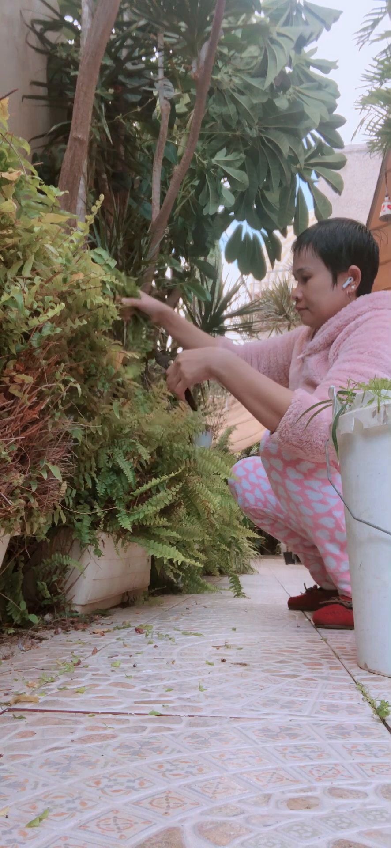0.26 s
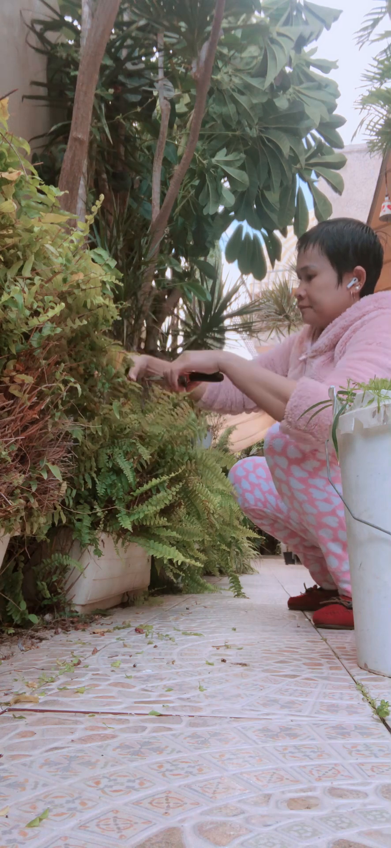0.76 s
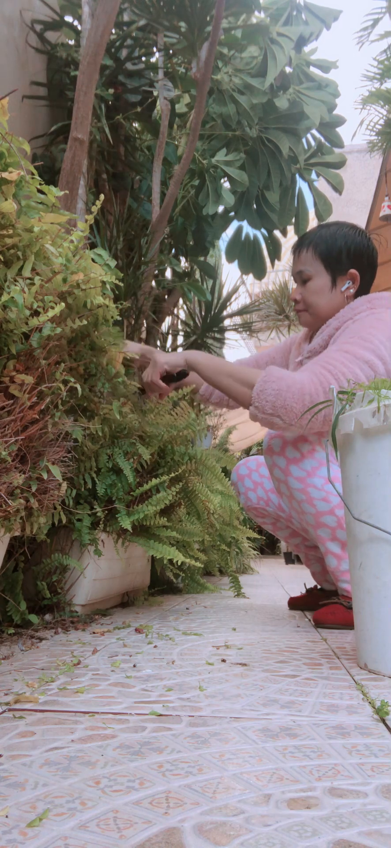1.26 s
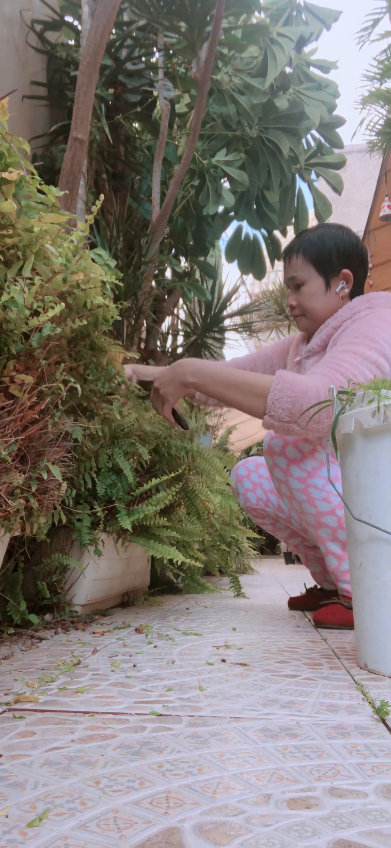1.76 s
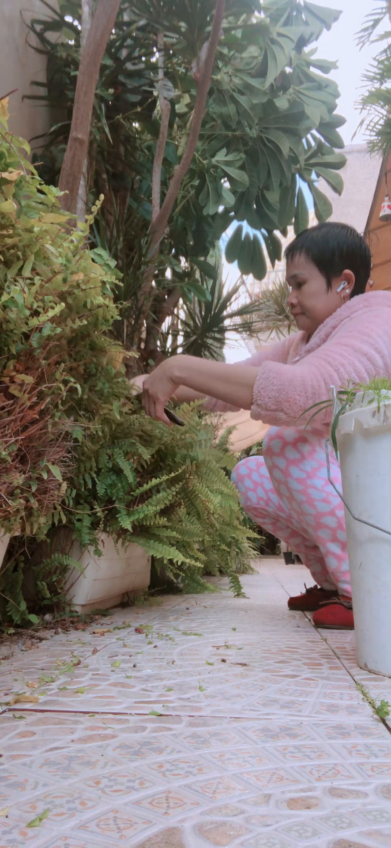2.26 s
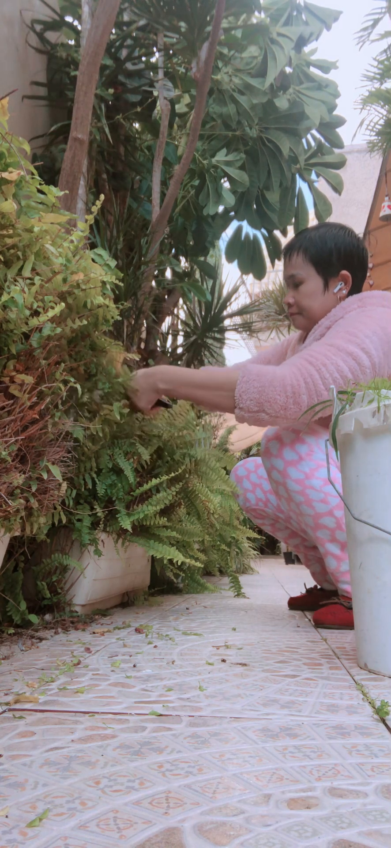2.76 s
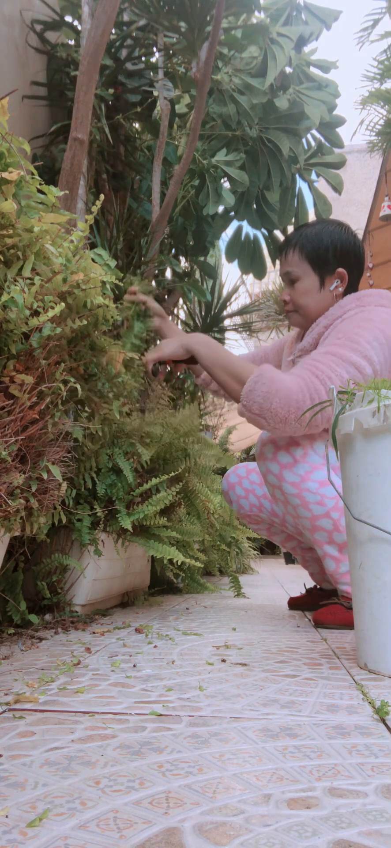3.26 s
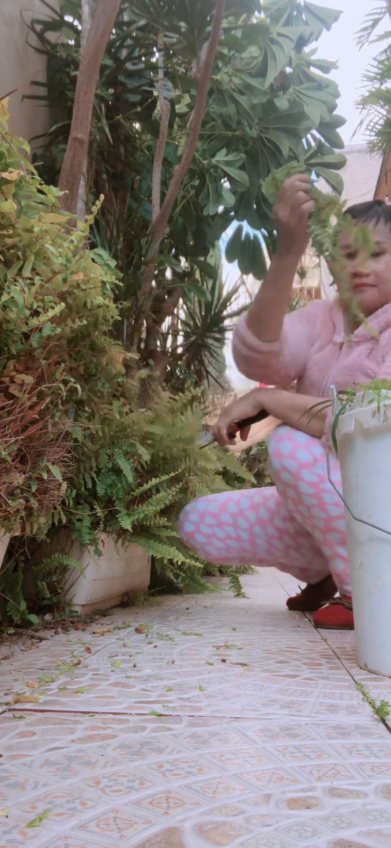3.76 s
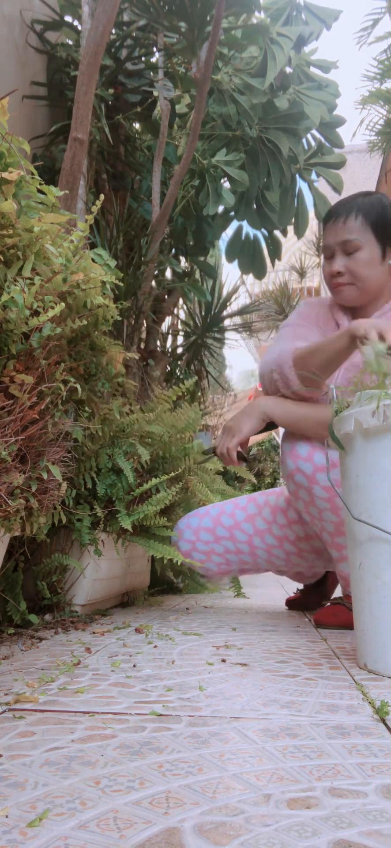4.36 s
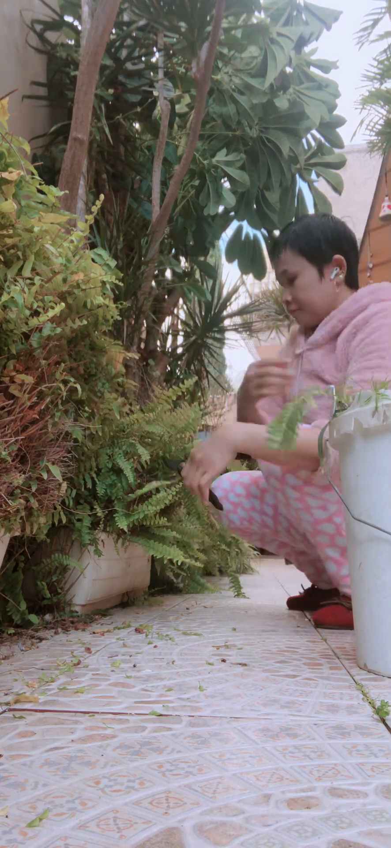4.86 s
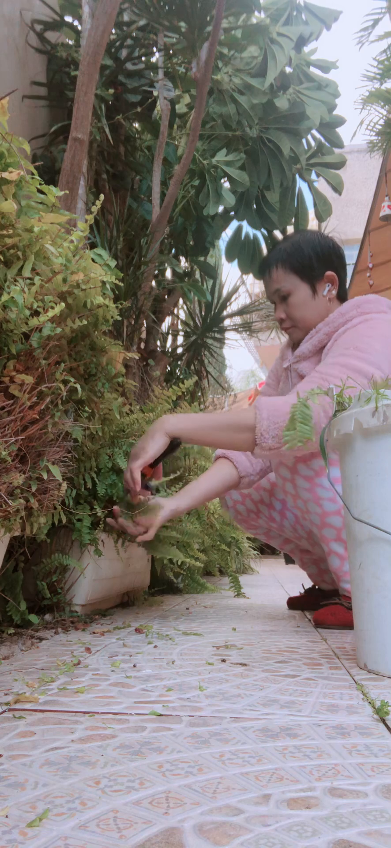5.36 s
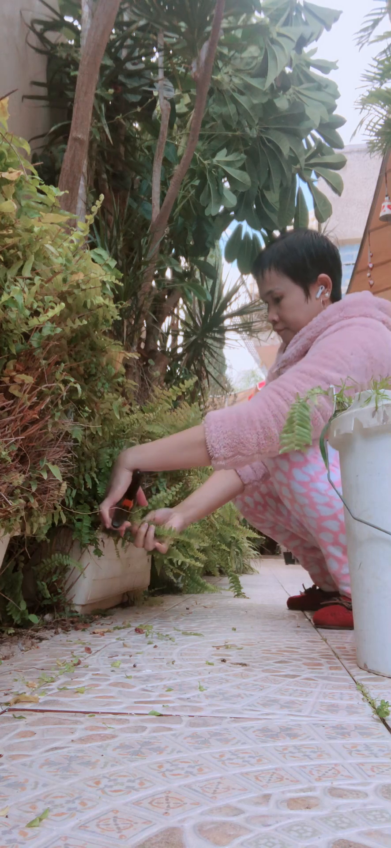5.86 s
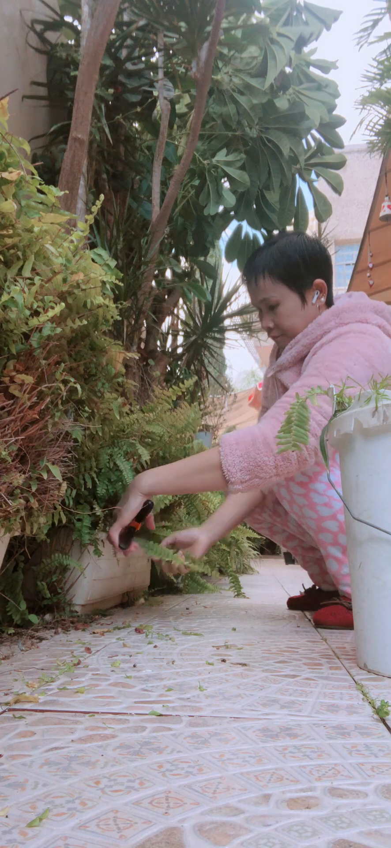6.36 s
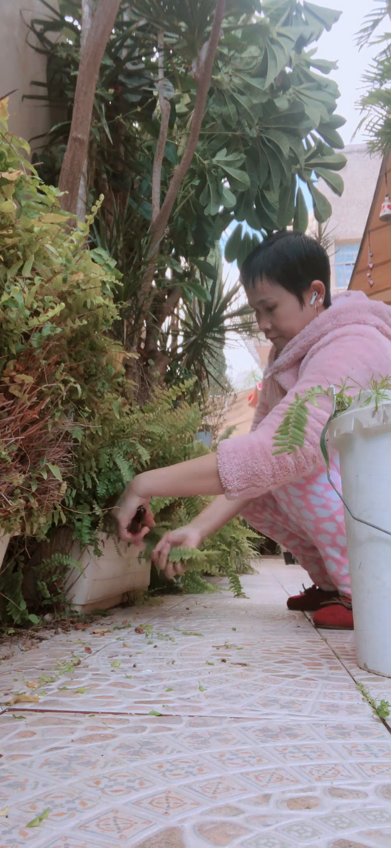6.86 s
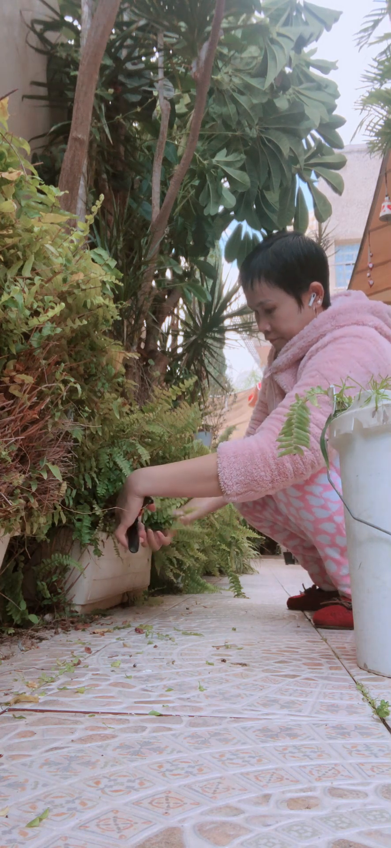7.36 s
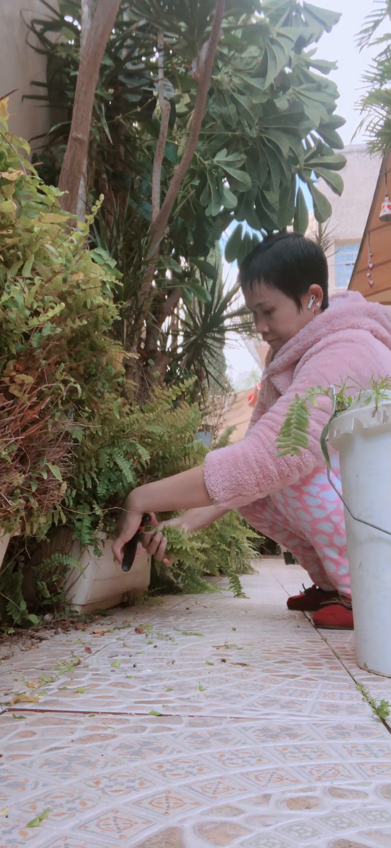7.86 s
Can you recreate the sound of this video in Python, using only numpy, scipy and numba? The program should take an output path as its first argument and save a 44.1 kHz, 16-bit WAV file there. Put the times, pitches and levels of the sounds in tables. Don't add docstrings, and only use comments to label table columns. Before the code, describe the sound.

Someone prunes plants close to the microphone in a small hard-walled yard. First come soft contacts, dry leaf rustle and distant chattering birds; then a snap and a hollow bucket thud with a short rattle. The flock thins, a shoe squeaks faintly, and bright shear crunches follow in a cluster, singly, then as light clicks. A low machine hum and town rumble persist throughout.

```python
import sys
import numpy as np
from scipy import signal
from scipy.fft import rfft, irfft
from scipy.io import wavfile
from numba import njit

SR = 44100
rng = np.random.default_rng(int(sys.argv[2]) if len(sys.argv) > 2 else 0)


def unload_audio(sound):
    columns = np.transpose(np.atleast_2d(sound))
    steps = np.round(np.clip(columns, -1, 1) * 32767)
    wavfile.write(sys.argv[1], SR, steps.astype(np.int16))


def decibels_to_gain(level_db):
    exponent = np.asarray(level_db, float) / 20
    return 10 ** exponent


N = 357200


def rms_one(x):
    return x / np.sqrt(np.mean(x ** 2) + 1e-20)


def in_time(rows):
    seconds, *columns = np.transpose(rows)
    return [np.interp(np.arange(N) / SR, seconds, column) for column in columns]


def drift(rate_hz):
    r = np.exp(-80 * np.pi * rate_hz / SR)
    slow = signal.lfilter([1], [1, -2 * r, r * r], rng.standard_normal(N // 40 + 2002))
    slow = slow[2000:]
    return np.interp(np.arange(N) / 40, np.arange(len(slow)), rms_one(slow))


def resonate(x, hz, width_hz):
    r = np.exp(-np.pi * width_hz / SR)
    top = np.array([1, 0, -1]) * (1 - r * r) / 2
    return signal.lfilter(top, [1, -2 * r * np.cos(2 * np.pi * hz / SR), r * r], x)


def twice(x, hz, width_hz):
    return resonate(resonate(x, hz, width_hz), hz, width_hz)


@njit
def glide(x, hz, width_hz, rate):
    r, y = np.exp(-np.pi * width_hz / rate), np.zeros(len(x))
    for i in range(2, len(x)):
        push = (1 - r * r) / 2 * (x[i] - x[i - 2])
        y[i] = push + 2 * r * np.cos(2 * np.pi * hz[i] / rate) * y[i - 1] - r * r * y[i - 2]
    return y


def coloured(x, spectrum):
    hz, db = np.transpose(spectrum)
    f = np.fft.rfftfreq(N, 1 / SR) + 1
    gain = decibels_to_gain(np.interp(np.log(f), np.log(hz), db))
    gain = gain * np.minimum(f / hz[0], 1) ** 4 * np.minimum(hz[-1] / f, 1) ** 8
    return rms_one(irfft(rfft(x) * gain, N))


def grains(per_s, spread_db):
    size = decibels_to_gain(spread_db * np.minimum(rng.exponential(1, N), 5))
    return (rng.random(N) < per_s / SR) * size * rng.choice([-1, 1], N)


def swells(rows, rise, fall, rest_db):
    t = np.arange(0, N + 200, 100) / SR
    power = decibels_to_gain(rest_db) ** 2
    for s, hold, db in rows:
        below_db = rise * np.maximum(s - t, 0) + fall * np.maximum(t - s - hold, 0)
        power = power + decibels_to_gain(db - below_db) ** 2
    return np.interp(np.arange(N) / SR, t, np.sqrt(power))


def town():
    # pitch in Hz, strength in dB per Hz.
    town_tone = [(16, -53), (28, -2.5), (106, -13.5), (124, -10), (153, -8), (216, -10), (399, -17),
                 (775, -20.5), (1280, -26), (2430, -31), (5830, -50), (7810, -69), (11300, -48),
                 (16000, -65)]
    # pitch in Hz, width in Hz, level in dB.
    hum_lines = [(50.5, 28, 3), (222.9, 10.6, -55), (772, 23, -68), (958, 360, -64)]
    # time in seconds, hum level in dB, rumble level in dB.
    hum_level = [(0.0, -36.5, -47.5), (0.79, -41, -45), (1.33, -39.5, -51), (1.74, -37, -42.5),
                 (2.64, -42, -50.5), (3.2, -37, -43.5), (3.88, -38.5, -48), (4.17, -39, -38),
                 (4.44, -41, -47), (5.21, -36.5, -46.5), (6.7, -40.5, -51.5), (8.1, -36.5, -44.5)]
    town_db, hum_hz = -46, 99.05
    hum_db, rumble_db = in_time(hum_level)
    out = decibels_to_gain(town_db + drift(1.2) / 2) * coloured(rng.standard_normal(N), town_tone)
    hum_phase = 2 * np.pi * hum_hz * np.arange(N) / SR + 0.5 * drift(2.5)
    out += np.sqrt(2) * decibels_to_gain(hum_db) * np.sin(hum_phase)
    for k, (hz, width_hz, db) in enumerate(hum_lines):
        line = decibels_to_gain(db) * rms_one(twice(rng.standard_normal(N), hz, width_hz))
        if k == 0:
            line = line * decibels_to_gain(rumble_db - 1.0)
        out += line
    return out


def leaves():
    # pitch in Hz, strength in dB per Hz.
    leaf_tone = [(2940, 11.5), (5000, -14), (6160, 13), (7670, -2), (8880, 10), (11700, 9.5), (15200, -4),
                 (16600, -23)]
    # full strength at in seconds, hold in seconds, level in dB.
    stirs = [(0, 0.042, -70), (.42, 0.039, -67), (1.42, 0.19, -63), (1.85, 0.093, -69), (2.02, 0.2, -64.5),
             (2.3, 0.14, -65), (2.6, 0.012, -59.5), (2.83, 0.22, -59), (3.52, 0.0093, -62),
             (3.9, 0.088, -55), (4.2, 0.05, -60), (4.57, .01, -73), (4.81, 0.0083, -73), (4.98, 0.039, -88),
             (5.26, .02, -76), (5.4, 0.082, -63.5), (5.77, 0.098, -65), (6.1, 0.018, -67), (6.44, .01, -71),
             (6.6, 0.14, -69), (6.9, 0.049, -66.5), (7.02, .01, -71), (7.24, 0.097, -59.5),
             (7.53, 0.12, -64.5), (7.75, 0.26, -64), (7.95, .045, -64), (8.03, .07, -65)]
    stir = swells(stirs, rise=107, fall=109, rest_db=-75)
    dry_grains = rms_one(grains(1200, spread_db=4.5))
    rustle = coloured(rng.standard_normal(N) + 0.58 * dry_grains, leaf_tone)
    return stir * decibels_to_gain(5.5 + 1.8 * drift(67) + 1.3 * drift(8.7)) * rustle


def twigs():
    # start in seconds, peak level in dB.
    ticks = [(0.4589, -51), (1.5249, -42), (2.0656, -34), (2.3431, -43), (3.6277, -50), (3.8631, -48),
             (4.568, -38), (4.8035, -44), (6.3001, -53), (6.4418, -38), (6.4455, -42), (6.186, -50),
             (6.321, -57), (6.3674, -55), (6.4114, -51), (7.0135, -40), (7.2394, -37), (7.3916, -42),
             (7.5737, -45), (8.0242, -44)]
    tick_s = 0.0015
    out, t = np.zeros(N + SR), np.arange(SR // 50) / SR
    for s, db in ticks:
        snap = resonate(rng.standard_normal(len(t)) * np.exp(-t / tick_s), 10500, 7000.0)
        out[int(s * SR):][:len(t)] += decibels_to_gain(db - 1.5) * snap / np.abs(snap).max()
    return out[:N]


def flock():
    # pitch in Hz, strength in dB per Hz.
    flock_tone = [(760, 33), (1300, -61), (1420, 0.5), (2380, 6.5), (3060, 2), (3530, 1.5), (6160, -6),
                  (7440, -19), (8500, -5.5), (11000, 18), (18700, -120)]
    # full voice at in seconds, hold in seconds,
    # level in dB, brightness in dB, throat pitch in Hz.
    flock_calls = [(0, 0.011, -56.5, -14, 2400), (.15, 0.048, -46.5, -6, 2230),
                   (.36, 0.056, -47, -5.5, 2730), (.47, 0.1, -48.5, -8, 2770), (.84, 0.052, -46, -8, 2200),
                   (1.08, 0.1, -49.5, -5, 2220), (1.22, 0.041, -49, -15, 1850),
                   (1.49, 0.067, -51.5, -5, 2280), (1.58, 0.056, -48, -12.5, 2070),
                   (1.81, 0.051, -49, -5.5, 1890), (1.94, 0.077, -52.5, -2, 2060),
                   (2.07, 0.091, -48.5, -10.5, 2340), (2.25, 0.089, -52, -9, 1840),
                   (2.41, 0.033, -48.5, -5.5, 2500), (2.53, 0.074, -48.5, -8, 2400),
                   (2.72, 0.1, -50.5, -8.5, 1750), (2.9, 0.069, -50.5, -9, 2120),
                   (3.06, 0.028, -49, -4, 2290), (3.2, 0.037, -47.5, -4.5, 1860),
                   (3.48, 0.027, -45, -7.5, 2440), (3.78, 0.076, -43.5, -7.5, 2550),
                   (3.97, 0.041, -46.5, -8, 2180),
                   (4.1, .04, -49.5, -17, 2400), (4.22, 0.2, -53, -9, 2030),
                    (4.5, 0.088, -57.5, -13, 2250), (4.67, 0.16, -48.5, -10.5, 2340),
                    (4.95, 0.028, -49, -7.5, 2420), (5.248, 0.066, -49, -12, 2450),
                    (5.41, 0.041, -50.5, -10.5, 2400), (5.55, 0.064, -49, -11, 2270),
                    (5.72, .06, -55, -19, 2300), (5.94, 0.064, -52.5, -9, 2320),
                    (6.11, 0.037, -50, -11, 2350), (6.43, 0.015, -55, -20, 2280),
                    (6.579, 0.1, -48.5, -4, 2550), (6.89, 0.074, -48, -11.5, 2510),
                    (7.18, 0.1, -45, -7.5, 2430), (7.52, 0.048, -54.5, -11, 2470),
                    (7.62, 0.07, -49, -7.5, 2490), (8.02, 0.073, -48, -8, 2470)]
    rise, lead_s, tail_s = 296, 0.04, 0.046
    throat_ratios, throat_scatter, throat_db = np.array((0.97, 1.523, 2.36)), 0.096, -7
    calls = flock_calls
    rasp = swells([call[:3] for call in calls], rise, fall=82, rest_db=-67.5)
    bright_rows = [(s, hold, db + bright_db) for s, hold, db, bright_db, _ in calls]
    bright = swells(bright_rows, rise, fall=147, rest_db=-70.5)

    pulses = np.diff(np.floor(np.cumsum(1150 * (1 + 0.091 * drift(40)) / SR)), prepend=0)
    source = coloured(0.66 * rms_one(pulses) + rng.standard_normal(N), flock_tone)

    low, top, edges = 0, 0, np.geomspace(1300, 8000, num=15)
    for k, band in enumerate(zip(edges, edges[1:])):
        band_filter = signal.butter(2, band, "band", fs=SR, output="sos")
        part = (-1) ** k * decibels_to_gain(3.0 * drift(10)) * signal.sosfilt(band_filter, source)
        if band[0] < 4500:
            low = low + part
        else:
            top = top + part
    out = decibels_to_gain(-1.0) * (rasp * rms_one(low) + bright * decibels_to_gain(2.5) * rms_one(top))

    for s, hold, db, _, hz in calls:
        air, scatter = rng.standard_normal(SR // 2), rng.standard_normal(3)
        at, length = int(max(s - lead_s, 0) * SR), lead_s + hold + tail_s
        t = np.arange(min(int(length * SR), N - at)) / SR
        throat_hz = hz * throat_ratios * (1 + throat_scatter * scatter * [0, 1, 1])
        voice = 0
        for k, f in enumerate(throat_hz):
            ring = twice(air, f, 170 + (60 + 0.057 * f) * k)[-len(t):]
            voice = voice + decibels_to_gain(-4.5 * k) * rms_one(ring)
        swell = np.sqrt(np.abs(np.sin(np.pi * t / length)))
        out[at:][:len(t)] += decibels_to_gain(db + throat_db) * swell * voice
    return out


def whistles():
    # start in seconds, length in seconds, from pitch in Hz, to pitch in Hz, level in dB.
    clear_notes = [(0.368, 0.085, 2740, 2750, -50), (.43, .15, 6320, 6380, -49),
                   (.54, .098, 3251, 3275, -46), (.54, 0.055, 4820, 4830, -49), (.8, .14, 2240, 2060, -54),
                   (0.844, 0.076, 3650, 3600, -50), (1.201, 0.22, 1860, 1824, -48),
                   (1.707, 0.12, 1840, 1860, -44), (1.82, 0.057, 2950, 2920, -49),
                   (1.909, .11, 2100, 2060, -53.5), (2.05, .09, 2350, 2400, -57),
                   (2.179, 0.13, 1790, 1800, -48), (2.37, .11, 2540, 2470, -51),
                   (2.5, .06, 2280, 2300, -51), (2.543, 0.075, 2410, 2426, -52),
                   (2.582, 0.11, 2100, 2080, -53.5), (2.68, .15, 1720, 1696, -54),
                   (2.89, .1, 2200, 2100, -50), (3.18, 0.19, 1890, 1820, -54),
                   (3.72, 0.067, 2550, 2850, -49), (3.962, 0.0334, 1510, 1780, -48),
                   (4.25, 0.065, 3110, 3170, -54), (7.27, .07, 2990, 2880, -52)]
    width_hz, clear_share = 55, 0.45
    out = np.zeros(N)
    for s, length, from_hz, to_hz, db in clear_notes:
        air = rng.standard_normal(SR // 3)
        t = np.arange(int(length * SR)) / SR
        hz = np.interp(np.arange(len(air)), [len(air) - len(t), len(air)], [from_hz, to_hz])
        breath = glide(glide(air, hz, width_hz, SR), hz, width_hz, SR)[-len(t):]
        tone = np.sqrt(2) * np.sin(2 * np.pi * np.cumsum(hz[-len(t):]) / SR)
        note = clear_share * tone + (1 - clear_share) * rms_one(breath)
        out[int(s * SR):][:len(t)] += decibels_to_gain(db) * np.sin(np.pi * t / length) * note
    return out


def cries():
    # start in seconds, length in seconds, pitch in Hz, level in dB.
    cry_rows = [(0.133, 0.099, 5130, -50.5), (.46, 0.12, 3840, -51), (0.527, .13, 4890, -65),
                (0.862, 0.078, 3700, -59), (1.14, 0.13, 2300, -51), (1.801, .09, 2930, -53),
                (1.81, 0.075, 3900, -50.5), (1.915, 0.094, 3590, -49.5), (1.925, 0.066, 4120, -49.5),
                (2.067, 0.068, 3760, -49), (2.295, 0.064, 3440, -51.5), (2.535, 0.045, 3580, -45),
                (2.574, 0.067, 4100, -48), (2.75, 0.11, 2500, -53), (2.891, .11, 4130, -51),
                (2.89, 0.055, 3670, -51), (3.047, .11, 3310, -50), (3.176, 0.11, 3670, -53),
                (3.49, 0.063, 4000, -49), (3.518, 0.076, 3400, -50), (3.776, 0.056, 4200, -48),
                (4.66, 0.067, 5700, -53), (4.79, .05, 5400, -56), (5.161, 0.056, 2500, -50.5),
                (5.963, 0.045, 3660, -52), (6.6, 0.095, 5140, -53), (6.902, 0.095, 4900, -55),
                (7.162, 0.036, 4200, -44), (7.26, .07, 4900, -55), (7.592, 0.053, 5500, -57)]
    width_hz = 240
    out = np.zeros(N + SR)
    for s, length, hz, db in cry_rows:
        t = np.arange(int(length * SR)) / SR
        voice = rms_one(twice(rng.standard_normal(SR // 4), hz, width_hz)[-len(t):])
        out[int(s * SR):][:len(t)] += decibels_to_gain(db) * np.sin(np.pi * t / length) * voice
    return out[:N]


def near_bird():
    # time in seconds, pitch in Hz, level in dB.
    chirps = [
        [(1.161, 8600, -70), (1.166, 8500, -27), (1.174, 8320, -30.5), (1.182, 8130, -39), (1.205, 7850, -35),
         (1.222, 7700, -45), (1.24, 7330, -43), (1.262, 7340, -49)],
        [(2.836, 8500, -53), (2.853, 7300, -37), (2.859, 6800, -24.5), (2.865, 6760, -21.5), (2.876, 6580, -34),
         (2.89, 7060, -54)],
        [(6.0445, 8450, -45), (6.047, 7700, -33), (6.056, 7200, -24.5), (6.0615, 7500, -28), (6.067, 6500, -20),
         (6.075, 6420, -29), (6.087, 6390, -22), (6.104, 6360, -35.5), (6.112, 6280, -39)],
        [(6.733, 6700, -62), (6.736, 6410, -24), (6.741, 7050, -19), (6.748, 7380, -22), (6.752, 7100, -24),
         (6.757, 7050, -25), (6.762, 6820, -33), (6.8, 6530, -38), (6.819, 6340, -45)],
    ]
    octave_db, wall_echo_s, wall_echo_db = -19.5, 0.0098, -13
    out, flutter_db = np.zeros(N), 2.5 * drift(120)
    for rows in chirps:
        hz, db = in_time(rows)
        first, last = rows[0][0], rows[-1][0]
        gate, = in_time([(first - 0.002, 0), (first + 0.002, 1), (last - 0.003, 1), (last + 0.003, 0)])
        db = db + flutter_db * np.clip((db.max() - db) / 15, 0, 1)
        phase = 2 * np.pi * np.cumsum(hz) / SR
        octave = decibels_to_gain(octave_db + 0.27 * (db - db.max())) * np.sin(2 * phase)
        out += np.sqrt(2) * gate * decibels_to_gain(db) * (np.sin(phase) + octave)
    return out + decibels_to_gain(wall_echo_db) * np.roll(out, int(wall_echo_s * SR))


def sole():
    # time in seconds, pitch in Hz, level in dB.
    squeak = [(5.12, 427, -65), (5.15, 490, -47), (5.172, 600, -55), (5.2, 880, -48), (5.26, 1000, -51),
              (5.33, 1050, -53), (5.38, 1204, -65)]
    hz, db = in_time(squeak)
    slips = glide(glide(rng.standard_normal(N), hz, 450.0, SR), hz, 450.0, SR)
    return decibels_to_gain(db + 2.2 * drift(25)) * rms_one(slips)


def planter():
    # start in seconds, level in dB.
    taps = [
        (4.009, -41),
        (7.978, -41),
    ]
    out, t = np.zeros(N), np.arange(SR // 20) / SR
    thud = t / 0.0035 * np.exp(1 - t / 0.0048) * np.sin(2 * np.pi * 480 * t)
    for s, db in taps:
        out[int(s * SR):][:len(t)] += decibels_to_gain(db) * thud
    return out


def bucket():
    # start in seconds, level in dB, hardness in Hz.
    landings = [
        (4.1566, -18, 2500),
        (4.159, 2, 706),
        (4.1636, -19.5, 1120),
        (4.1812, -5, 280),
        (4.194, -24, 1200),
        (4.21, -21, 1200),
        (4.172, -26, 1500),
        (4.187, -24, 1800),
        (4.219, -20.5, 900),
        (4.23, -29, 1500),
    ]
    # pitch in Hz, level in dB, time to fall by 60 dB in seconds.
    wall_notes = [(132, -24, 0.063), (228, -2, 0.16), (349, 8.5, 0.019), (550, 8.5, 0.022), (774, -12, 0.1),
                  (915, 1.5, 0.037), (1780, 4, 0.031), (2500, -10, .04)]
    blows = np.zeros(N) + 1e-18
    t = np.arange(SR // 50) / SR
    for s, db, hard_hz in landings:
        push = t * np.exp(-2 * np.pi * hard_hz * t)
        blows[int(s * SR):][:len(t)] += decibels_to_gain(db) * push / push.sum()
    out = 0
    for hz, db, t60 in wall_notes:
        r, w = decibels_to_gain(-60 / (t60 * SR)), 2 * np.pi * hz / SR
        out = out + decibels_to_gain(db) * signal.lfilter([0, np.sin(w)], [1, -2 * r * np.cos(w), r * r], blows)
    no_bass = signal.butter(2, 130, "high", fs=SR, output="sos")
    return 0.21 * signal.sosfilt(no_bass, out)


def cuttings():
    out, t = np.zeros(N), np.arange(SR // 8) / SR
    rattle = twice(grains(2800, spread_db=0.0)[:len(t)], 1000, 1640.0)
    out[int(4.156 * SR):][:len(t)] = decibels_to_gain(-35.5) * rms_one(rattle) * np.exp(-t / 0.043)
    return out


def shears():
    # time in seconds, peak level in dB, main ring in Hz,
    # blade ring in dB, treble in dB.
    snips = [(0.948, -34, 2010, -3, -5), (2.59, -41, 2140, -11, -15), (3.929, -15, 2550, -30, -28),
             (3.962, -29, 2300, -24, -22), (4.1574, -20.5, 1760, -32, -17), (4.1735, -28.5, 1710, -6, -8.5),
             (5.848, -11.5, 2800, -10, -6), (5.8738, -22, 2630, 3, -2), (5.9, -13, 2930, -2.5, -6),
             (5.9048, -18, 2500, -12, 1), (6.025, -33, 1910, -2.5, -19), (6.521, -38, 3060, -9, -17),
             (6.5482, -12, 2800, -5, -5), (7.878, -50.5, 2600, 7, 13), (7.926, -53, 2630, 14, 12),
             (7.9529, -29.5, 2860, 0, 6), (7.979, -32, 4770, -3, -3), (7.9853, -28.5, 5000, 1, -6),
             (5.841, -38, 2800, -6, -20), (5.849, -19.5, 4600, -4, -12), (5.857, -26.5, 2900, -6, -4),
             (5.87, -39, 2900, -6, 3), (5.896, -30, 3220, -2, -6), (6.553, -27, 2770, -2, -9),
             (7.993, -30, 2200, -12, -15), (7.948, -39, 4830, -6, 0), (7.9535, -28, 4650, -4, -11),
             (3.929, -24, 1700, -22, -20)]
    # pitch in Hz, width in Hz, level in dB.
    blade_rings = [(5900, 600, 1), (4600, 1000, -9)]
    # pitch in Hz, width in Hz, level in dB.
    treble_rings = [(8800, 4700, 11), (11140, 2900, 10.5), (12400, 2700, 10)]
    out, t = np.zeros(N + SR), np.arange(SR // 10) / SR
    for s, db, hz, blade_db, treble_db in snips:
        crunch_s = 0.0009 * (1 + 0.06 * np.clip(-19 - db, 0, 15))
        late = t / crunch_s - 8
        after = late > 0
        burst = np.exp(-(late * np.where(after, 0.8, 1.6)) ** 2)
        skirt = np.where(after, 0.5 * np.exp(-late / 7), 0.08 * np.exp(late / 3))
        rough = rng.standard_normal(len(t)) * (burst + skirt)
        crunch = rough + 3.8 * np.diff(late >= 0, prepend=False)

        handle = twice(crunch, hz, 880.0) + 0.22 * twice(crunch, 3550, 2100.0)
        handle = signal.sosfilt(signal.butter(2, 0.7 * hz, "high", fs=SR, output="sos"), handle)
        handle = handle + 0.08 * resonate(crunch, 1200, 1500)
        blade = 0.5 * twice(crunch, 5300, 2900.0)
        for f, width_hz, ring_db in blade_rings:
            blade = blade + decibels_to_gain(ring_db) * twice(crunch, f, width_hz)
        treble = 0
        for k, (f, width_hz, ring_db) in enumerate(treble_rings):
            treble = treble + (-1) ** k * decibels_to_gain(ring_db) * twice(rough, f, width_hz)

        at = int((s - 8 * crunch_s) * SR)
        for part, part_db in (handle, -2.5), (blade, blade_db), (treble, treble_db):
            out[at:][:len(t)] += decibels_to_gain(db + part_db) * part / np.abs(part).max()
    return out[:N]


def yard(x):
    t60_s = 0.2
    t = np.arange(SR // 2) / SR
    hits = rng.random(len(t)) < 0.01 + 3 * t
    tail = rng.standard_normal(len(t)) * hits * decibels_to_gain(-60 * t / t60_s) * (t > 0.006)
    return signal.fftconvolve(x, tail / np.sqrt(np.sum(tail ** 2)))[:N]


def scene():
    background = town() + leaves()
    far = flock() + whistles() + cries()
    near = twigs() + near_bird() + sole() + planter() + bucket() + cuttings() + shears()
    echo = decibels_to_gain(-18) * yard(near + 3.74 * far)
    return (near + far + echo + background)[None]


def low_pass(x):
    return signal.sosfilt(signal.butter(12, 15830, fs=SR, output="sos"), x)


def record(dry):
    top_cut = signal.cheby2(16, 40, 16800, fs=SR, output="sos")
    mix = signal.sosfilt(top_cut, dry)
    return low_pass(mix)


dry = scene()
out = record(dry)
unload_audio(out)
```